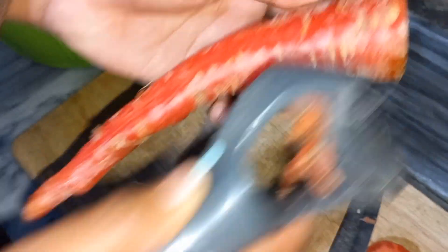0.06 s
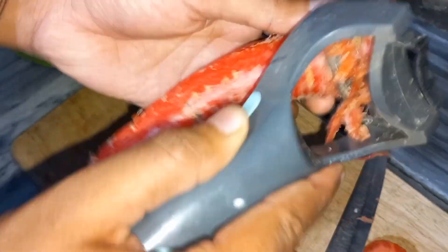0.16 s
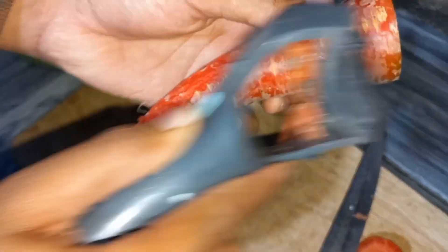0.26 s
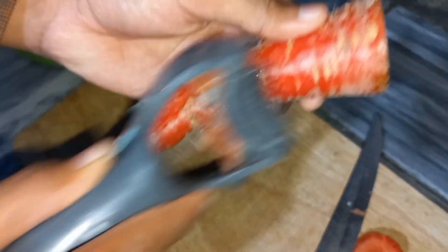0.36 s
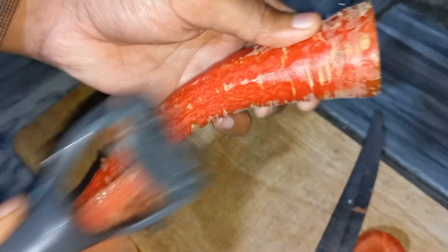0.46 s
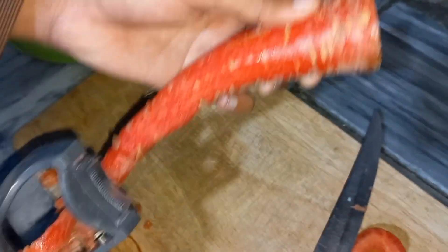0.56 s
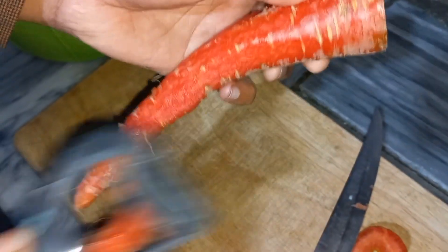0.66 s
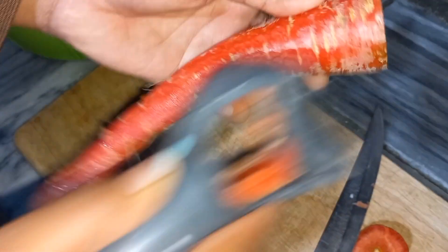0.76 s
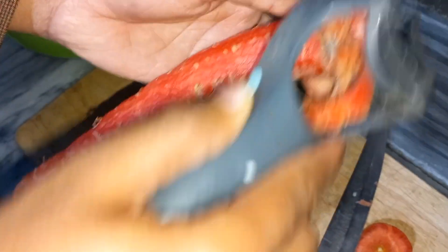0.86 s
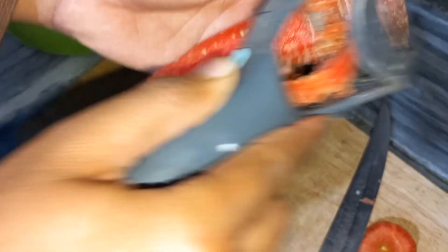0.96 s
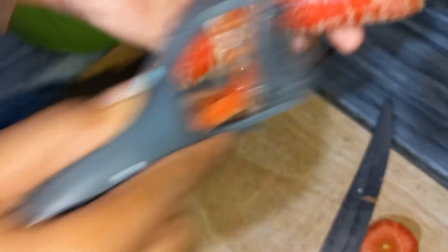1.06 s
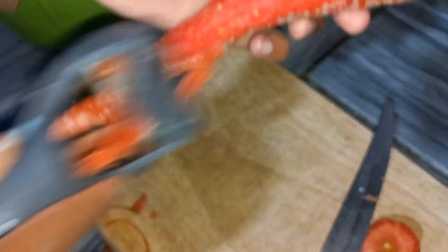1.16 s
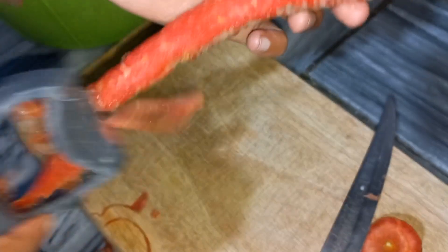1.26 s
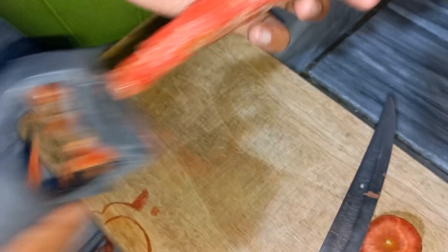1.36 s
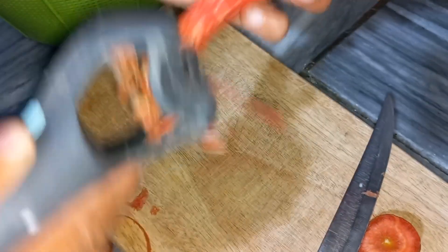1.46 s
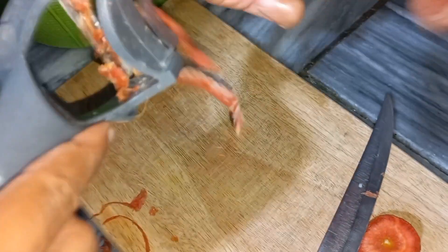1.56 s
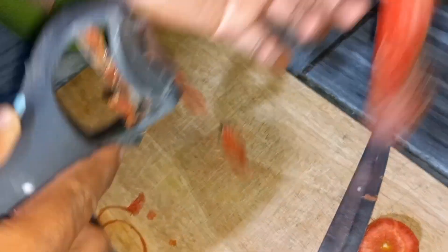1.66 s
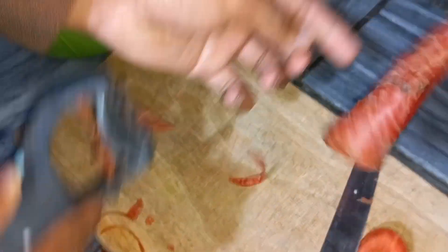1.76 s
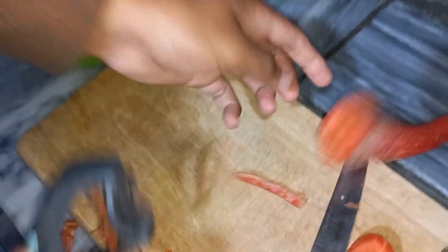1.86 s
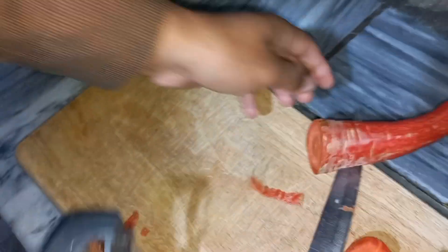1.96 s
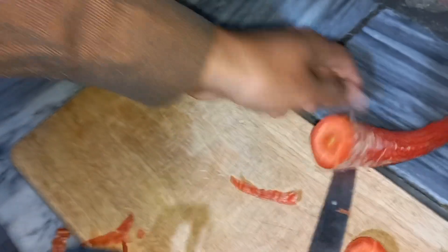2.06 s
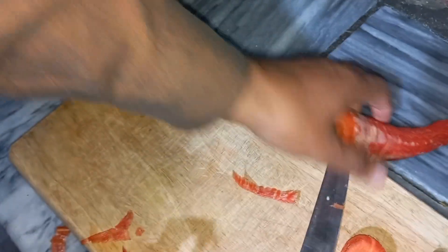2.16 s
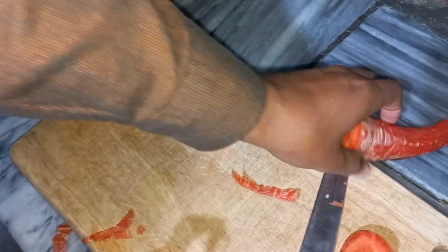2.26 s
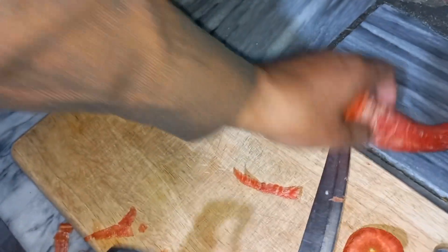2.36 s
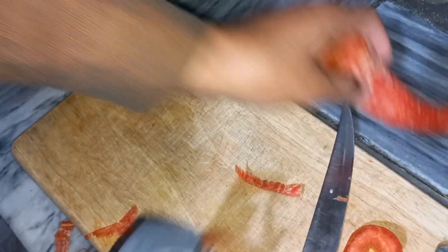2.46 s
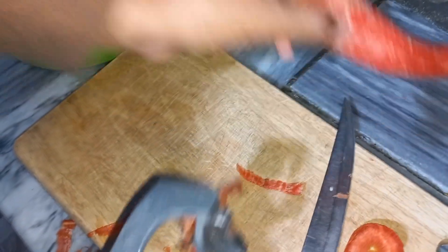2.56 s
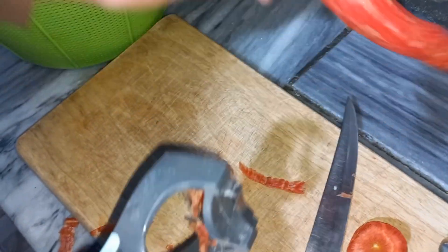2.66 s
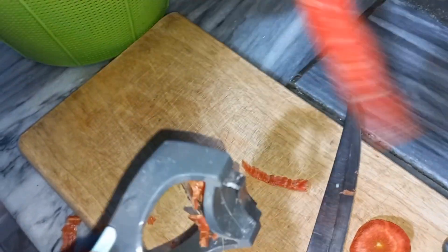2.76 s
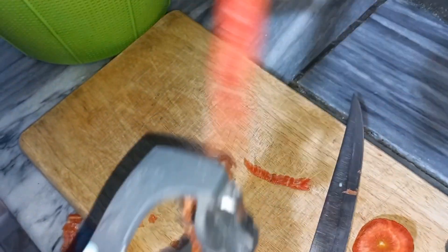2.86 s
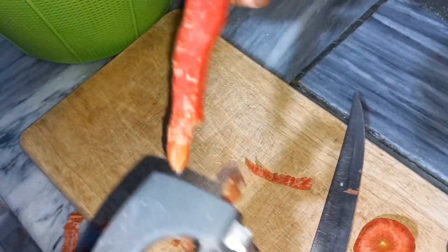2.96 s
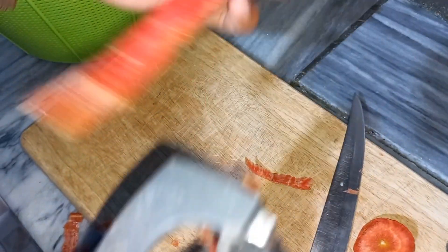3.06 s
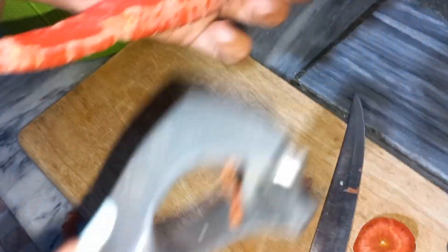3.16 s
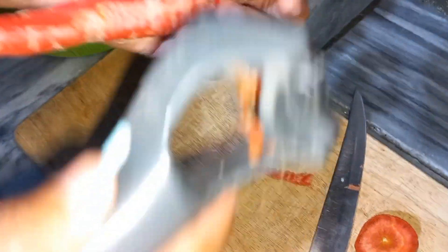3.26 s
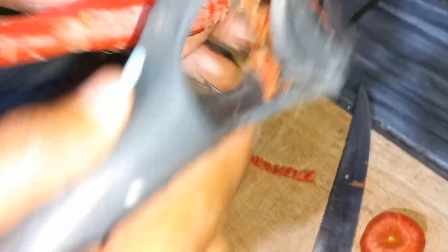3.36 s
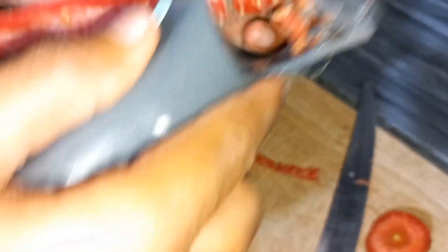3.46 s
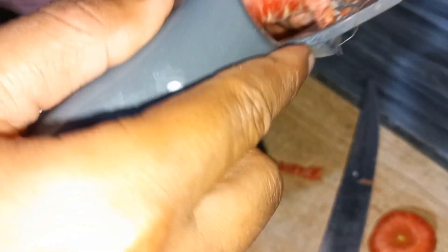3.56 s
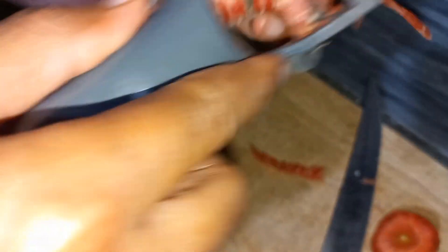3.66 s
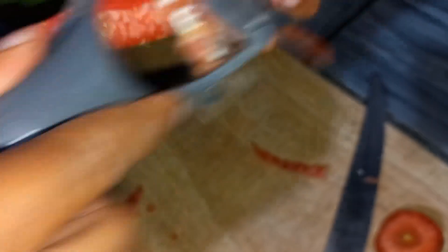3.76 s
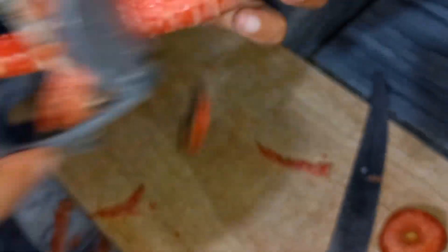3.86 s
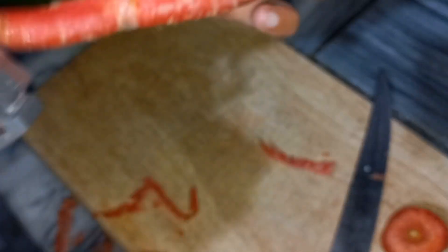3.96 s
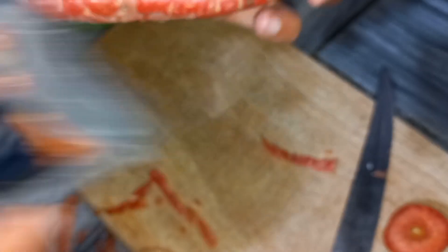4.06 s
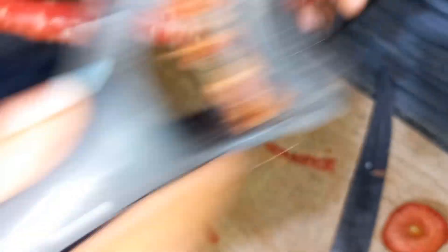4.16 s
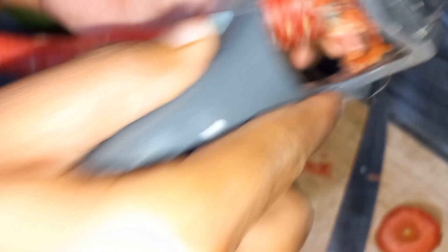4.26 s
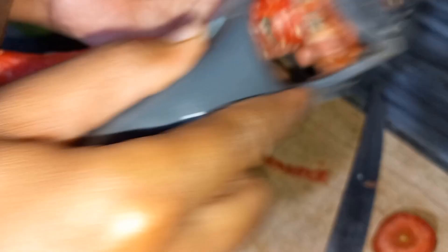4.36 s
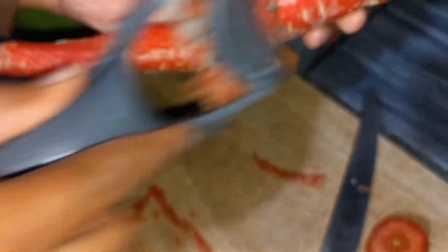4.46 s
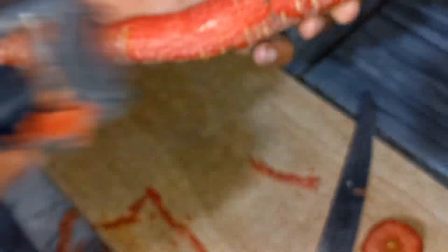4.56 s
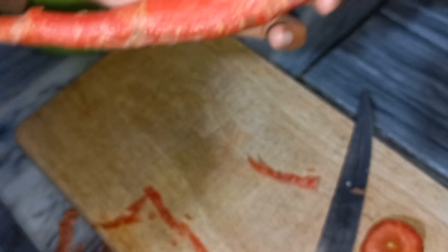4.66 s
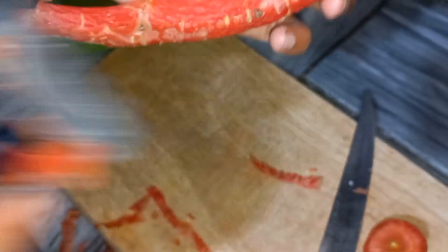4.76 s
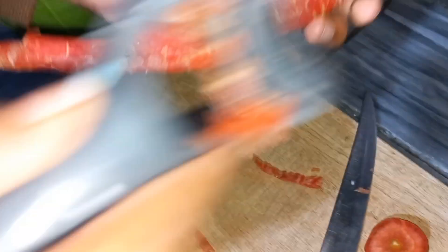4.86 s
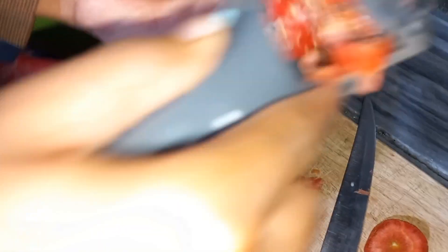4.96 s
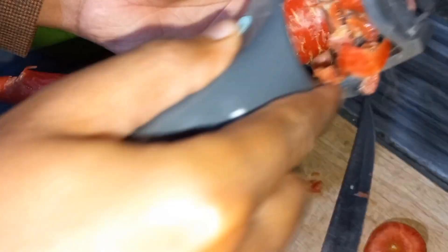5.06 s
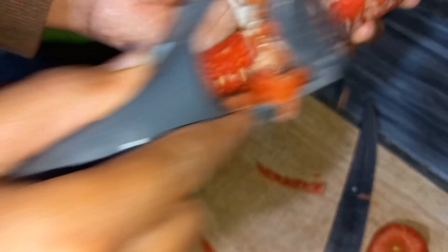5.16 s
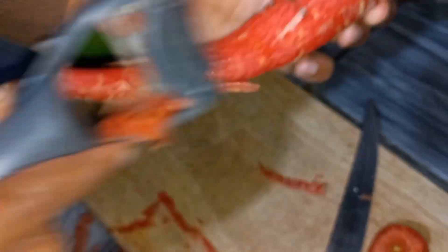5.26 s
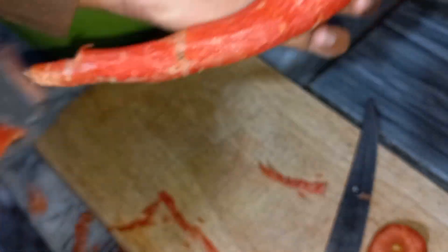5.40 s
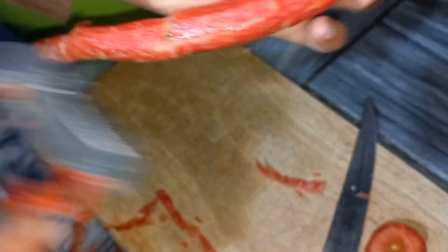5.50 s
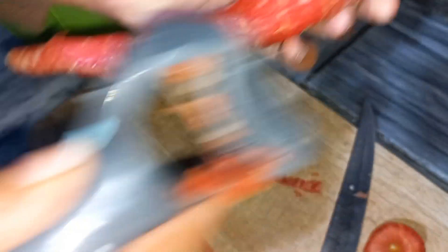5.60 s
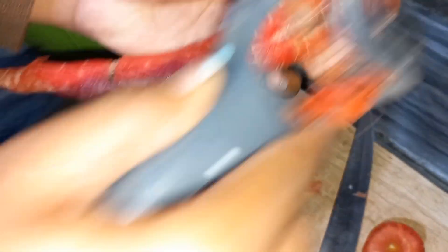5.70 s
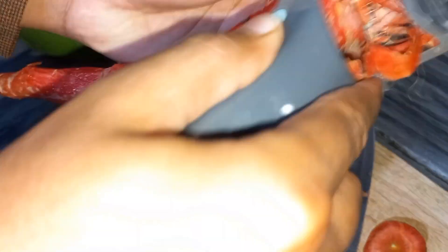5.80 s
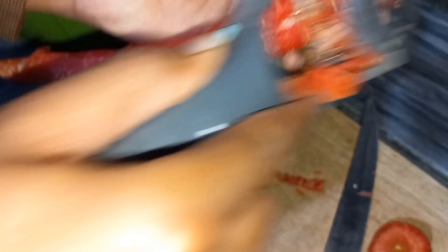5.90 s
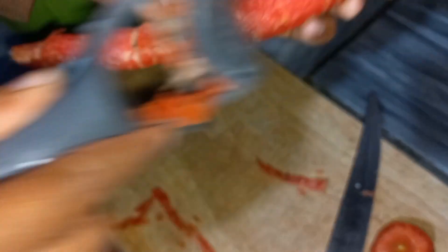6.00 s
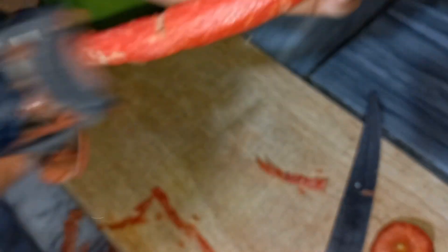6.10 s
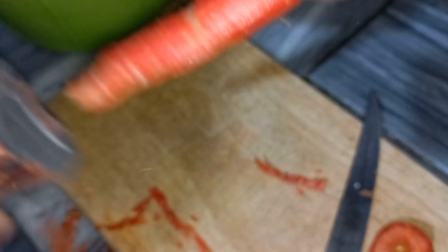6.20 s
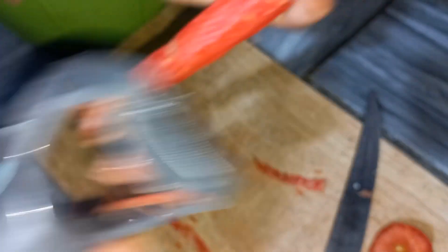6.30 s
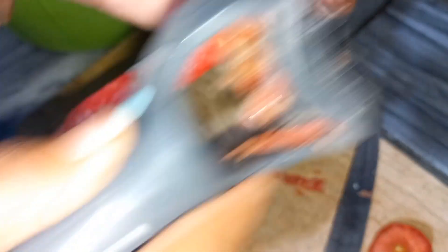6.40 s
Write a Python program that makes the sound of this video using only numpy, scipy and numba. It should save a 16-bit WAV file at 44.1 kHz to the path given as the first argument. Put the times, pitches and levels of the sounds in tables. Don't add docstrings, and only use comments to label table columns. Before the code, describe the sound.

A small kitchen, heard a hand's width from a phone, with faint room hush, skin rubbing and sleeve rustle. At 0.07 s a plastic peeler clacks onto a carrot and scrapes until about 0.5, a crunchy, stick-slip rasp ringing the hollow frame with a wet, bright hiss. A second, stronger stroke runs 0.8 to 1.2, ending in loose swivel rattles. From 1.6 to 2.1 the carrot slips and bounces: an irregular flurry of woody knocks, loudest near 1.68 and 1.81, late cracks around 2.05, with a low counter boom beneath. Then quiet handling, faint ticks and thin dragging squeaks until 3.4. Peeling resumes with a softer landing at 3.46 and a stuttering scrape to 3.9, then sharp tap-and-rasp strokes at 4.2, 4.95 and 5.7, each about a third of a second, with small snags and squeaks. A dull grip thump at 6.1 to 6.2 closes into rustle.

```python
import sys
import numpy as np
from scipy import signal
from scipy.fft import rfft, irfft, next_fast_len
from scipy.io import wavfile
from scipy.ndimage import uniform_filter1d
from numba import njit

SR = 44100
rng = np.random.default_rng(int(sys.argv[2]) if len(sys.argv) > 2 else 0)


def to_wav(sig):
    pcm = np.clip(np.atleast_2d(sig), -1, 1) * 32767
    pcm = np.round(pcm).astype(np.int16)
    wavfile.write(sys.argv[1], SR, pcm.T)


def boost(x):
    u = np.asarray(x, float) / 20
    return 10 ** u


N = 283871
T = np.arange(N) / SR

# peak in seconds, rumble in dB, rubbing minus rumble in dB, rise and fall in
# seconds for 20 dB.
HANDS = [(.27, -69, 9, .3, .6), (.46, -61, -1, .45, .1), (.84, -66, -4, .35, .6), (1.08, -73, 15, .4, .35),
         (1.29, -65, 12, .13, .2), (2.28, -60, -2, .2, .11), (2.6, -78, 1.5, .35, 1.2),
         (3.21, -65, -10, .17, .9), (3.38, -63.5, -5, .6, .25), (3.82, -54, 5, .3, .12),
         (4.03, -56, -4, .14, .25), (4.38, -57, 1.5, .22, .3), (4.53, -57.5, 0, .6, .09),
         (5.24, -63.5, 12, .3, .3), (5.6, -57, 1.5, .2, .6), (6.03, -65, 12, .6, .09),
         (6.19, -47, -12, .14, .26)]
STILL_DB = -80
# frequency in Hz, density in dB per Hz.
RUMBLE_SPECTRUM = [(70, -10), (90, -8), (118, 2), (135, -5.5), (180, -13.5)]
# frequency in Hz, density in dB per Hz.
RUB_SPECTRUM = [(94, -32), (160, -6.5), (221, -8.5), (354, -4), (442, -7), (534, -3), (1050, -15),
                (1360, -40.5), (2310, -120)]
# time in seconds, rustle in dB.
SLEEVES = [(0., -64), (.7, -63.5), (1.3, -59), (1.504, -56), (1.61, -61.5), (2.3, -61), (2.62, -69.5),
           (3.032, -78), (3.308, -75), (3.33, -67), (4.1, -59), (4.19, -66), (4.66, -75), (5.42, -67),
           (5.605, -63), (5.62, -56), (6.18, -59), (6.3, -65)]
# frequency in Hz, density in dB per Hz.
RUSTLE_SPECTRUM = [(530, -42.5), (900, -20), (1150, -16.5), (1200, -16), (1530, -8.5), (1950, -9),
                   (2470, -9), (2660, -15), (3040, -11), (3860, -14), (5040, -15.5), (6800, -19),
                   (7800, -30), (16000, -24.5)]
# time in seconds, thump in dB.
THUMP = [(6.08, -75), (6.1, -48), (6.182, -45.5), (6.42, -72)]
# frequency in Hz, density in dB per Hz.
GRIP_SPECTRUM = [(25, -21.5), (45, -6.5), (65, -1), (85, -14)]
# frequency in Hz, density in dB per Hz.
ROOM_SPECTRUM = [(24, -41), (40, -12), (124, -2.5), (1090, -26), (1520, -17.5), (2210, -28), (2500, -12.5),
                 (2980, -20.5), (5870, -23), (16000, -36.5)]
ROOM_DB = -73.5

# start in seconds, end in seconds, frequency in Hz, level in dB.
SQUEAKS = [(5.605, 5.71, 8250, -57), (0., .06, 3065, -66), (0., .06, 1520, -68), (4.68, 4.85, 1240, -74),
           (4.72, 4.96, 1410, -71), (4.7, 4.9, 2530, -79), (5.47, 5.6, 2560, -76), (5.48, 5.6, 2100, -77),
           (5.62, 5.69, 900, -64), (.21, .39, 570, -57), (1.24, 1.36, 185, -57), (1.25, 1.35, 320, -57.5),
           (1.23, 1.34, 620, -62), (3.33, 3.42, 470, -69), (6.12, 6.2, 2430, -68), (6.1, 6.2, 3500, -71),
           (6.33, 6.44, 2550, -70), (6.37, 6.44, 1050, -70), (5.12, 5.3, 800, -57), (4.52, 4.63, 2160, -60)]
# start and end in seconds, first and last frequency in Hz,
# level in dB.
GLIDES = [(6.26, 6.44, 2740, 2660, -66), (5.54, 5.62, 850, 1000, -70)]
# frequency in Hz, level in dB.
DRAG_PARTIALS = [(1520, -1), (1740, -3), (2200, -3), (2520, 0), (2790, -7), (3000, -5), (3460, -5)]
DRAG_S, DRAG_DB, DRAG_FADE_DB = (2.25, 2.86), -75.5, 3

# start in seconds, peak in dB, ring in Hz, treble minus peak in dB.
LANDINGS = [(.0739, -14, 2240, -4.5), (.8163, -17, 3050, -3), (3.4609, -31, 2820, .5),
            (3.472, -26.5, 2250, -8), (4.2246, -14.5, 3240, 1), (4.9457, -17.5, 1380, -3),
            (5.6994, -15, 3490, -4)]
# start in seconds, peak in dB, ring in Hz, treble minus peak in dB,
# left minus right in dB.
SNAGS = [(.1577, -32, 3360, -4, 1), (.1707, -28, 2440, 0, 1), (.191, -26, 2400, 6, 1),
         (.894, -27, 2000, 2, 2), (.926, -27, 1880, 0, 0), (3.5308, -42, 2320, -8, 0),
         (3.5811, -32, 2340, -4, 2), (3.651, -17, 2320, -10, 3), (3.773, -29, 3060, 0, 5),
         (3.79, -27, 2900, 2, 3), (3.8506, -21, 2260, 0, 5), (3.88, -32, 2500, 2, 3),
         (4.3105, -27, 2330, -3, 0), (4.5186, -25, 2180, -1, 6), (4.983, -31, 2750, -5, 0),
         (5.064, -24, 2600, -8, 1), (5.09, -24, 2300, -8, 1), (5.1205, -19, 2800, 7.5, 1),
         (5.14, -25, 2300, -6, 1), (5.169, -25, 3030, -2, 1), (5.1985, -26, 2330, -2, 2),
         (5.256, -27, 2850, 4, 3), (5.2885, -23.5, 2150, -1, .5), (5.7794, -20, 2220, -3, .5),
         (5.8001, -26, 2280, 0, 0), (5.812, -19, 1870, -.5, 1), (6.0101, -19, 2810, -3, 4)]
# start in seconds, peak in dB, ring in Hz, treble minus peak in dB.
FLAPS = [
    (.5304, -36, 3170, -2),
    (1.1395, -17.5, 2090, 1),
    (1.2189, -25, 3200, -5),
    (1.4885, -32.5, 2200, -4),
    (1.775, -35, 2700, 8),
    (1.787, -41, 2700, 8),
]
# start in seconds, peak in dB, ring in Hz.
TICKS = [(.5886, -46.5, 2660), (1.4223, -42, 2900), (1.445, -50, 4200), (1.474, -45, 2800),
         (1.54, -50, 2200), (1.554, -46, 2150), (1.565, -48, 3000), (2.2153, -48.5, 1510),
         (2.2473, -48, 1733), (2.29, -58, 3500), (2.32, -58, 3400), (4.0292, -38, 2720),
         (4.0685, -46, 2180), (5.614, -47, 2770)]
LAND_PAN_DB, FLAP_PAN_DB, TICK_PAN_DB = .6, 2.1, -3
LAND_RATTLE_S, SNAG_RATTLE_S, FLAP_RATTLE_S, TICK_RATTLE_S = .0045, .0027, .007, .0028
TICK_TREBLE_DB = -12
# frequency in Hz, density in dB per Hz.
TAP_SPECTRUM = [(410, -54.5), (700, -39.5), (1280, -10.5), (3200, -5), (3940, -7.5), (6150, -2),
                (9230, -14), (10800, -1), (12800, -14.5), (16000, -8)]

# blade lands, bites and leaves the skin in seconds, wet hiss minus pressure at the bite in
# dB, the same at the end in dB.
STROKES = [(.09, .17, .43, 1, 3), (.83, .89, 1.15, 4, 5), (3.49, 3.6, 3.83, -4, 5),
           (4.24, 4.3, 4.51, -5, 3), (4.96, 5.06, 5.25, -4, 5), (5.715, 5.78, 5.98, -5, 7)]
# time in seconds, level in dB.
PRESSURE = [
    [(.09, -53), (.165, -42.5), (.172, -37), (.254, -35.5), (.398, -38), (.45, -35.5), (.46, -46),
     (.486, -52), (.57, -76)],
    [(.83, -50), (.885, -43), (.895, -40), (.981, -28), (.993, -38), (1.125, -40), (1.15, -43),
     (1.182, -47.5), (1.3, -71.5)],
    [(3.49, -60), (3.526, -49), (3.575, -48), (3.582, -38), (3.628, -38), (3.802, -36.5), (3.836, -40.5),
     (3.865, -42), (3.927, -68)],
    [(4.24, -48), (4.298, -39), (4.306, -35.5), (4.324, -30), (4.376, -32.5), (4.505, -38), (4.53, -41),
     (4.636, -84)],
    [(4.96, -43), (5.086, -28), (5.244, -42), (5.27, -47), (5.3, -40.5), (5.312, -54.5), (5.42, -95)],
    [(5.715, -52), (5.772, -46.5), (5.785, -34.5), (5.879, -30.5), (5.967, -37), (5.985, -44),
     (6.006, -34.5), (6.12, -88)],
]
# time in seconds, length in seconds, depth in dB.
SKIPS = [(3.766, .007, -11), (3.841, .006, -6), (5.117, .004, -6), (5.135, .004, -6), (5.995, .008, -5),
         (.915, .006, -4)]
# frequency in Hz, width in Hz, level in dB.
FRAME_MODES = [(1380, 110, -5.5), (1877, 34, 3), (2270, 160, -3.5), (2480, 170, -4.5), (2815, 200, -3),
               (3026, 200, -7.5), (4250, 200, -9.5), (4500, 130, -6), (4950, 150, -11), (6300, 200, -11),
               (11600, 400, -15)]
# frequency in Hz, density in dB per Hz.
HISS_SPECTRUM = [(2290, -34.5), (3900, -7.5), (4160, -3), (4820, -3), (5490, -9.5), (6440, -3.5),
                 (8560, -14.5), (11000, -4), (13400, -5), (15200, -6.5), (16000, -10)]
# frequency in Hz, gain in dB.
NOTCH = [(900, -1), (3300, 1), (3700, -5), (4050, 0.5), (16000, 1.5)]
LAND_WET_DB, SLIDE_WET_DB = 4, -5
LIFT_WET_DB, LIFT_S = -3, .03
BITE_HZ, END_HZ, LIFT_HZ = 2280, 2750, 2500
LOAD_DB, LOAD_SHARE = -37, .7

# start in seconds, peak in dB, then low wood, high wood and crack minus peak in dB.
BOUNCES = [(1.62, -16.5, -10, -9, -14), (1.634, -24, -3.5, -5, -15.5), (1.662, -30, -5, -20, -25),
           (1.678, -7, -22, -10, -17), (1.692, -25, -10, -14, -25), (1.705, -17, -6.5, 2, -16),
           (1.711, -18, -6, 0, -18), (1.73, -23, -8, -20, -30), (1.745, -25, -8, -20, -30),
           (1.758, -26, -6, -14, -28), (1.774, -25, -3, -4, -4), (1.781, -19.5, -8, -2, -14),
           (1.797, -21, -10, -20, -22), (1.808, -8.5, -15, 3, -4), (1.82, -22, -10, 3, -14),
           (1.834, -18, -10, 0, -10), (1.855, -13, -14, -14, -25), (1.867, -26, -8, -14, -25),
           (1.879, -13, -17, -22, -22), (1.899, -21, -15, -22, -20), (1.925, -25, -10, -2, -18),
           (1.95, -34, -3, -15, -25), (1.976, -40, 2, -15, -20), (1.999, -46, 20, -18, -13),
           (2.012, -46, 19, -18, -20), (2.046, -15, -12, 4, -9), (2.064, -20, -9.5, -22, -15),
           (2.0705, -17, -11, 4, -9), (2.09, -32, -2, 0, -12), (2.11, -36, 5, -4, -25),
           (2.172, -40, -3, -15, -25)]
# frequency in Hz, level in dB, decay by 60 dB in seconds.
BOARD_MODES = [(181.5, -8, .06), (230, -3.5, 0.053), (290, -2.5, 0.055), (380, -2, .05), (493, 0, 0.056),
               (593, -1, 0.036), (683, 6.5, 0.015), (814, -6.5, 0.026), (1023, -5, 0.028),
               (926, -4.5, 0.021), (1140, -5, 0.024), (1302, -11, .022), (1528, -5.5, 0.02),
               (1830, -10.5, 0.012), (2100, -5, 0.0092), (2450, -1, 0.01753), (2715, 1, .014),
               (3060, -4.5, .015), (3350, -8.5, 0.012), (3600, -14, 0.014), (4140, -14, .014),
               (4900, -18.5, 0.018)]
EARLY_HZ, LATE_HZ, SHIFT_S = 2470, 2740, 1.91
KNOCK_HZ = 1030

# peak in seconds, lower mode in dB, upper mode in dB.
BOOM = [(1.638, -22, -23), (1.655, -23, -24), (1.67, -23, -23.5), (1.72, -35, -36), (1.81, -33, -36),
        (1.85, -30, -31.5), (1.89, -30, -48), (1.96, -38, -44), (2.0, -39, -44), (2.14, -45, -41.5)]
BOOM_HZ, BOOM_CREST_S = [86.2, 114], 1.6405
BOOM_RISE_S, BOOM_FALL_S = .012, [.13, .09]

# frequency in Hz, left minus right in dB.
PORTS = [(150, 1.2), (600, 1.6), (1300, 1), (2400, -5.5), (4400, -3), (8000, -1.5), (15000, -1.5)]
ALIKE_HZ = 900
SHARED, LAG_S = 0.16, .00013
TOP_HZ = 15750


def level(x):
    return x / np.sqrt(np.mean(x ** 2))


def on_log_hz(table, hz):
    f, v = np.transpose(table)
    return np.interp(np.log(hz + 1), np.log(f), v)


def colour(x, table, edge_db=30):
    hz = np.arange(2049) * SR / 4096
    below = np.maximum(np.log2(table[0][0] / (hz + 1)), 0)
    above = np.maximum(np.log2((hz + 1) / table[-1][0]), 0)
    gain_db = on_log_hz(table, hz) - np.minimum(edge_db * (below + above), 60)
    cepstrum = irfft(gain_db * np.log(10) / 20)
    cepstrum[1:2048] *= 2
    cepstrum[2049:] = 0
    response = irfft(np.exp(rfft(cepstrum)))
    return signal.oaconvolve(x, response[None], axes=1)[:, :x.shape[1]]


def ports(x):
    size = next_fast_len(x.shape[1])
    hz = np.arange(size // 2 + 1) * SR / size
    alike = np.clip(SHARED + (1 - SHARED) / (1 + (hz / ALIKE_HZ) ** 2), 0, 1)
    late = np.exp(-1j * np.pi * hz * LAG_S * np.array([[-1], [1]]))
    z = rfft(x, size)
    both = np.sqrt(alike) * late * z[0] + np.sqrt(1 - alike) * z[1:]
    return irfft(both, size)[:, :x.shape[1]]


def pan(db):
    return boost(np.array([db, -db]) / 2)


def curves(tables, off):
    rows = [(tables[0][0][0] - .012, *off(tables[0][0]))]
    for table, after in zip(tables, tables[1:] + [[[N]]]):
        rows += list(table)
        if after[0][0] - table[-1][0] > .05:
            rest = off(table[-1])
            rows += [(table[-1][0] + .03, *rest), (after[0][0] - .012, *rest)]
    s, *columns = np.transpose(rows)
    return [np.interp(T, s, c) for c in columns]


def swells(s, db, rise_s, fall_s):
    t = T[::64]
    late = t - s[:, None]
    rise, fall = np.reshape(rise_s, (-1, 1)), np.reshape(fall_s, (-1, 1))
    top_db = (db[:, None] - 20 * np.maximum(-late / rise, late / fall)).max(axis=0)
    return np.interp(T, t, top_db)


def walk(rate, count=1):
    k = int(SR / rate)
    held = np.repeat(rng.standard_normal((count, N // k + 1)), k, axis=1)
    return 1.2 * uniform_filter1d(held, k, axis=1)[:, :N]


@njit
def svf(x, hz, width):
    y, band, low, g, k = np.empty(len(x)), 0., 0., 0., 0.
    for i in range(len(x)):
        if i % 32 == 0:
            g, k = np.tan(np.pi * hz[i] / SR), width / hz[i]
        v = (band + g * (x[i] - low)) / (1 + g * (g + k))
        band, low, y[i] = 2 * v - band, low + 2 * g * v, k * v
    return y


def resonate(streams, hz, width):
    return np.array([svf(x, np.full(len(x), 1. * hz), 1. * width) for x in streams])


def add(out, s, x):
    i = int(s * SR)
    out[:, i:i + x.shape[1]] += x[:, :N - i]


def hands():
    thump_db, = curves([THUMP], lambda row: (-84,))
    rustle_db = np.interp(T, *np.transpose(SLEEVES))
    s, rumble_db, rub_db, rise_s, fall_s = np.transpose(HANDS)
    moves = [np.maximum(swells(s, db, rise_s, fall_s), STILL_DB) for db in (rumble_db, rumble_db + rub_db)]
    levels_db = [thump_db] + moves + [rustle_db, ROOM_DB]
    spectra = GRIP_SPECTRUM, RUMBLE_SPECTRUM, RUB_SPECTRUM, RUSTLE_SPECTRUM, ROOM_SPECTRUM
    out = 0
    for db, spectrum, flicker_db in zip(levels_db, spectra, 1.8 * walk(15, count=5)):
        noise = ports(rng.standard_normal((3, N)))
        out = out + boost(db + flicker_db) * level(colour(noise, spectrum))
    return out


def drag(count=3):
    rows = []
    for hz, db in DRAG_PARTIALS:
        shift, pitch, span = rng.random((count, 3)).T
        when = (np.arange(count) + shift) / count
        s = np.interp(when, [0, 1], DRAG_S)
        hz = hz * (1 + .03 * (pitch - .5))
        rows += zip(s, s + .15 + .12 * span, hz, hz, DRAG_DB + db - DRAG_FADE_DB * when)
    return rows


def squeaks():
    out, t = np.zeros((1, N)), T[:SR]
    steady = [(start, end, hz, hz, db) for start, end, hz, db in SQUEAKS]
    for start, end, first_hz, last_hz, db in steady + GLIDES + drag():
        length_s = end - start
        noise = rng.standard_normal(SR)
        waver, flicker = walk(7, count=2)[:, :SR]
        gate = np.clip(np.minimum(t, length_s - t) / 0.026, 0, 1)
        hz = np.interp(t, [0, length_s], [first_hz, last_hz]) * (1 + .003 * waver)
        tone = level(svf(noise, hz, 20 + first_hz / 200))
        add(out, start, (boost(db + 1.2 * flicker) * gate * tone)[None])
    return out


def taps():
    out, t = np.zeros((2, N)), T[:4000]
    split = [signal.butter(3, 4500, kind, fs=SR, output="sos") for kind in ("low", "high")]
    rows = [(*r, LAND_PAN_DB, LAND_RATTLE_S) for r in LANDINGS]
    rows += [(*r, SNAG_RATTLE_S) for r in SNAGS]
    rows += [(*r, FLAP_PAN_DB, FLAP_RATTLE_S) for r in FLAPS]
    rows += [(*r, TICK_TREBLE_DB, TICK_PAN_DB, TICK_RATTLE_S) for r in TICKS]
    for s, db, hz, treble_db, pan_db, rattle_s in rows:
        decay = np.exp(-(t / rattle_s) ** 2) + .25 * np.exp(-t / 0.015)
        rattle = np.minimum(t / 0.0009, 1) * decay
        x = colour(ports(rng.standard_normal((3, len(t)))) * rattle, TAP_SPECTRUM)
        x = x + boost(6) * resonate(x, hz, 250)
        frame = sum(boost(mode_db) * resonate(x, f, width) for f, width, mode_db in FRAME_MODES[:6:2])
        x = x + boost(-1.5) * frame
        low, high = (level(signal.sosfilt(sos, x)) for sos in split)
        add(out, s, boost(db - 19.5) * pan(pan_db)[:, None] * (low + boost(treble_db) * high))
    return out


def travel():
    rows = []
    for land, bite, leave, bite_db, end_db in STROKES:
        rows += [(land, bite_db + LAND_WET_DB, BITE_HZ),
                 ((land + bite) / 2, bite_db + SLIDE_WET_DB, BITE_HZ),
                 (bite, bite_db, BITE_HZ),
                 (leave, end_db, END_HZ),
                 (leave + LIFT_S, LIFT_WET_DB, LIFT_HZ)]
    s, wet_db, hz = np.transpose(rows)
    return np.interp(T, s, wet_db), np.interp(T, s, hz)


def scrape():
    press_db, = curves(PRESSURE, lambda row: (-95,))
    on = press_db > -94
    press_db = press_db + sum(db * np.exp(-((T - s) / length_s) ** 2) for s, length_s, db in SKIPS)
    press_db, hiss_db, frame_hz = (c[on] for c in (press_db, *travel()))
    hiss_db = hiss_db - LOAD_SHARE * np.maximum(press_db - LOAD_DB, 0)
    slips = rng.standard_normal((3, N))[:, on] * boost(2.2 * rng.exponential(size=(3, N))[:, on])
    slips = ports(level(slips) * boost(1.5 * walk(110) + 1.8 * walk(250, count=3))[:, on])
    count = len(FRAME_MODES)
    drift = 1 + (.015 * walk(14, count=count) + .025 * walk(3, count=count))[:, on]
    swell_db = (1.8 * walk(30, count=count) + 1.5 * walk(4, count=count))[:, on]
    ring = 0
    for k, (hz, width, db) in enumerate(FRAME_MODES):
        near_db = 6 * np.exp(-((hz - frame_hz) / 300) ** 2)
        centre = hz * drift[k]
        mode = np.array([svf(svf(x, centre, 1.3 * width), centre, 3.8 * width) for x in slips])
        ring = ring + boost(db + swell_db[k] + near_db) * mode
    spray = colour(slips * boost(0.6 * walk(40)[:, on]), HISS_SPECTRUM)
    bands = 4300 * 1.27 ** np.arange(6)
    patch_db = 2.2 * walk(30, count=len(bands))[:, on]
    hiss = level(sum(boost(db) * resonate(spray, hz, 0.33 * hz) for hz, db in zip(bands, patch_db)))
    out = np.zeros((2, N))
    out[:, on] = colour(boost(press_db) * (boost(1.6) * level(ring) + boost(hiss_db + 2.5) * hiss), NOTCH)
    return out


def bounces():
    out, t = np.zeros((2, N)), T[:7000]
    hz, mode_db, t60 = np.transpose(BOARD_MODES)[:, :, None]
    group = np.digitize(hz[:, 0], [780, 1950])
    crack = [(250, -12), (1700, -5), (4200, -2.5), (7000, -17), (9000, -32), (15000, -32)]  # (Hz, dB)
    for s, db, low_db, high_db, crack_db in BOUNCES:
        best_hz = EARLY_HZ if s < SHIFT_S else LATE_HZ
        chance = rng.standard_normal((4, len(hz), 1))
        struck_db = 3 * np.exp(-((hz - best_hz) / 250) ** 2) + 3 * np.exp(-((hz - KNOCK_HZ) / 150) ** 2)
        struck_db = struck_db + 1.5 * chance[0]
        fade = boost(mode_db + struck_db) * np.exp(-np.log(1000) * t / t60) * np.minimum(t / 0.0006, 1)
        turn = 2 * np.pi * hz * (1 + 0.033 * chance[1]) * t + 3 * chance[2]
        lag = chance[3] * (.15 + hz / 5000)
        modes = np.array([fade * np.sin(turn + lag), fade * np.sin(turn - lag)])
        contacts = rng.standard_normal(len(t)) * (rng.random(len(t)) < .08)
        contacts = contacts * (np.exp(-t / 0.003) + 0.04 * np.exp(-t / 0.028))
        parts = []
        for k in range(3):
            wood = signal.fftconvolve(modes[:, group == k].sum(1), contacts[None], axes=1)
            parts.append(wood[:, :len(t)])
        burst = rng.standard_normal((2, len(t))) * (np.exp(-t / .003) + 0.25 * np.exp(-t / 0.03))
        parts.append(colour(burst, crack))
        parts_db = low_db + 2.2, 0, high_db, crack_db + 2.5
        blow = sum(boost(d) * p / np.abs(p).max() for d, p in zip(parts_db, parts))
        add(out, s, boost(db + 1.5) * blow)
    return out


def counter():
    s, *blows_db = np.transpose(BOOM)
    wander = np.cumsum(0.06 * walk(25, count=2), axis=1)
    wander = wander - wander[:, [int(BOOM_CREST_S * SR)]]
    out = 0
    for hz, db, fall_s, w in zip(BOOM_HZ, blows_db, BOOM_FALL_S, wander):
        boom = np.cos(2 * np.pi * hz * (T - BOOM_CREST_S + w / SR))
        out = out + np.sqrt(2) * boost(swells(s, db, BOOM_RISE_S, fall_s)) * boom
    return out


def kitchen(x, t60_low=0.32, t60_high=0.17):
    t = T[:22000]
    noise = ports(rng.standard_normal((3, len(t))))
    low = signal.sosfilt(signal.butter(1, 2500, fs=SR, output="sos"), noise)
    high = noise - low
    tail = low * np.exp(-np.log(1000) * t / t60_low) + high * np.exp(-np.log(1000) * t / t60_high)
    tail *= np.clip((t - .003) / 0.0014, 0, 1)
    tail = tail / np.sqrt((tail ** 2).sum(1, keepdims=True))
    return signal.fftconvolve(x, tail, axes=1)[:, :N]


def scene():
    background = hands() + squeaks()
    peeler = taps() + scrape()
    board = bounces()
    room = kitchen(boost(-14) * peeler + boost(-7.5) * board)
    return background + peeler + board + counter() + room


def roll_off(x):
    return signal.sosfilt(signal.butter(12, 16950, fs=SR, output="sos"), x)


def record(dry):
    size = next_fast_len(N)
    hz = np.arange(size // 2 + 1) * SR / size
    x = irfft(rfft(dry, size) * pan(on_log_hz(PORTS, hz)), size)[:, :N]
    x = signal.sosfilt(signal.ellip(10, .2, 75, TOP_HZ, fs=SR, output="sos"), x)
    x = signal.sosfilt(signal.butter(3, 55, "high", fs=SR, output="sos"), x)
    return roll_off(np.clip(x, -1, 1))


dry = scene()
out = record(dry)
to_wav(out)
```